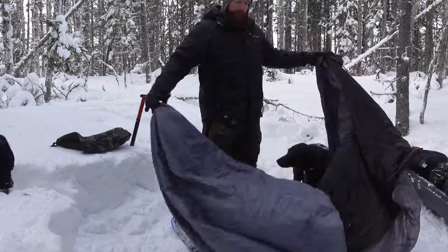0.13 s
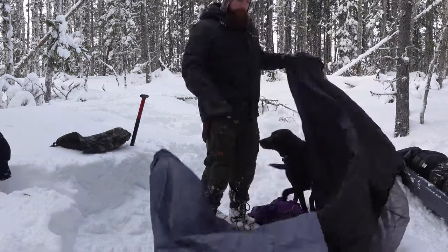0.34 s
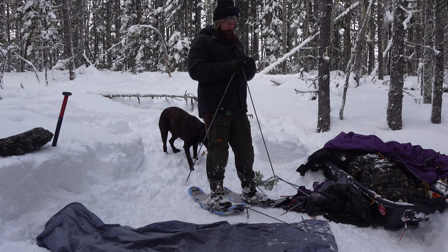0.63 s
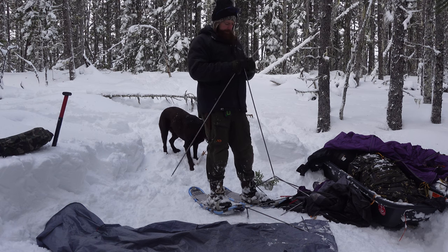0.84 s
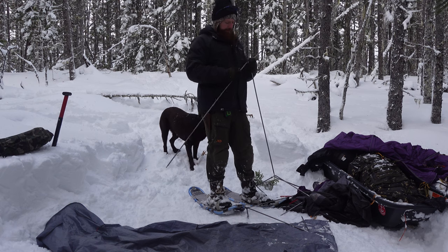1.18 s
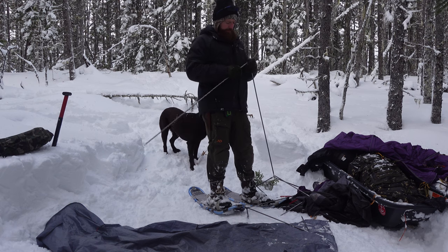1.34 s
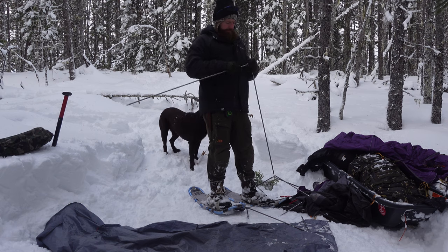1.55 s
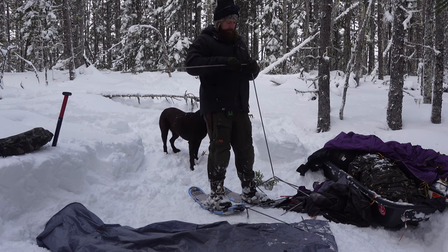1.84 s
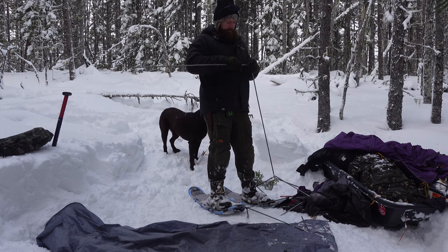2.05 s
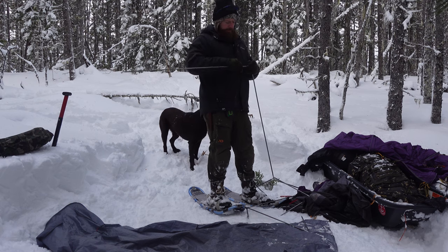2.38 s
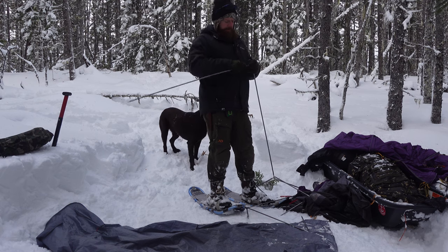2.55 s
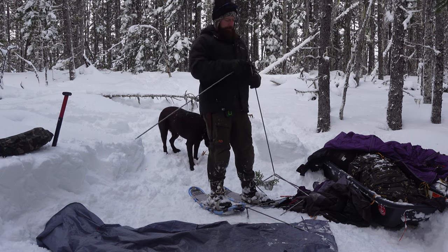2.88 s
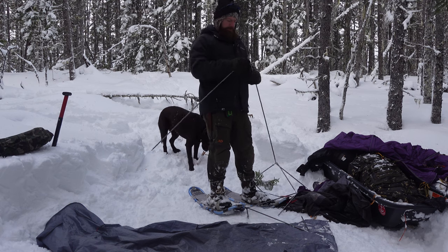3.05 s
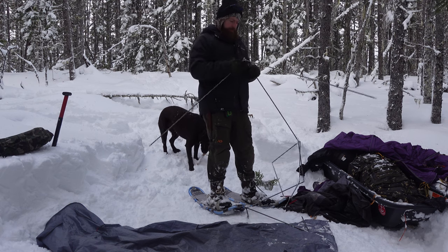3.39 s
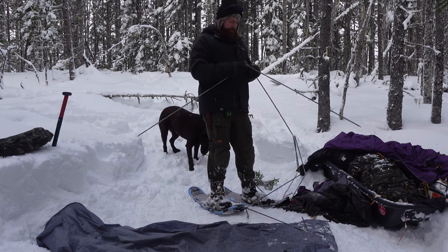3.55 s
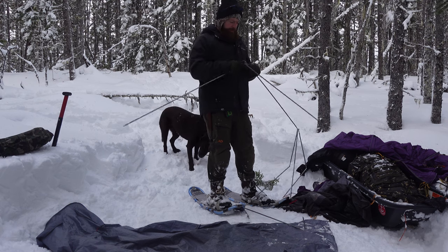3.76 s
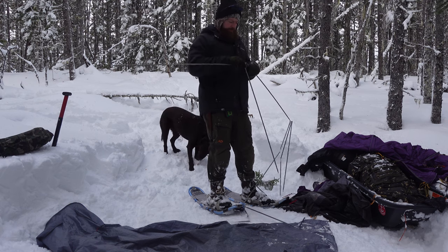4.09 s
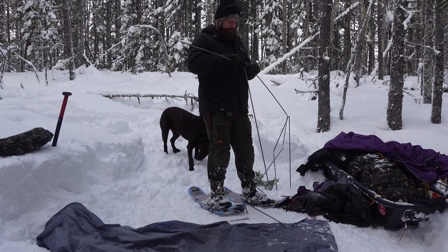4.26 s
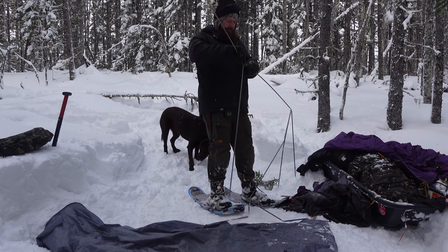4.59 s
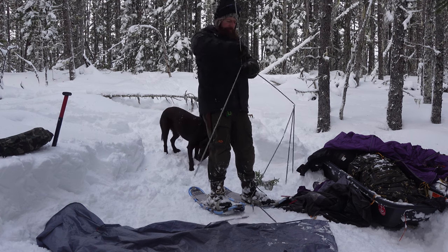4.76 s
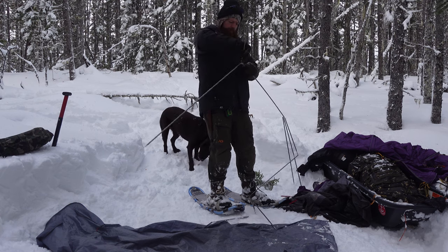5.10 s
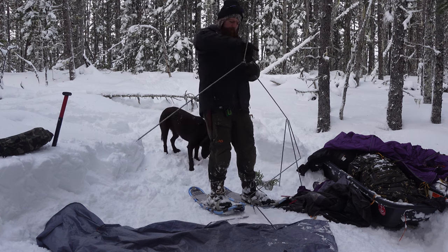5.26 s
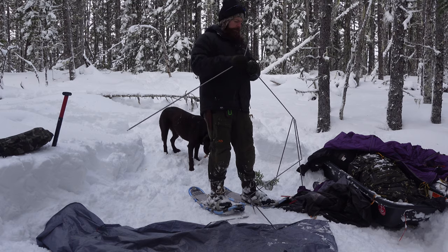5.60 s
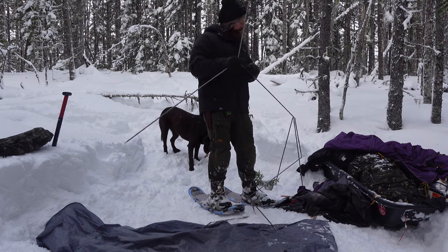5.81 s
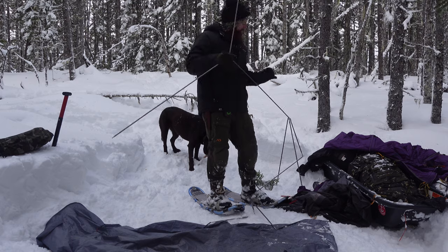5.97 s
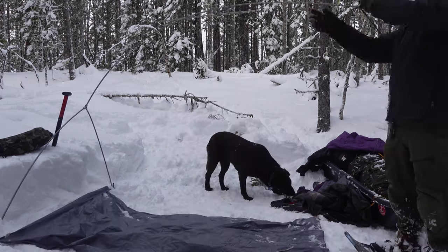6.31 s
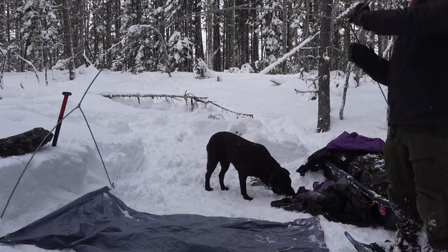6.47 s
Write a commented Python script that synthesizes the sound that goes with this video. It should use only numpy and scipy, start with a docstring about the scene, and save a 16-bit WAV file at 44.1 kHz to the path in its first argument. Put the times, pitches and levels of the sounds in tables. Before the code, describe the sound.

In a quiet snowy forest, tent fabric flaps for a moment, with a small jingle of dog tags. Irregular clicks, rattles and hollow knocks follow as tent pole sections meet, with one small metal clink among them and one sharp knock standing out. Low wind buffets the microphone beneath a faintly rustling jacket. Two soft sliding hisses and several dull knocks finish as the wind drops.

```python
"""Thin tent poles on an elastic cord are fitted together in a snowy forest: their ends tick and rattle as they
touch, and hiss as they slide into their sleeves. Blows ring the air in the tubes as hollow knocks. Before that,
a tent sheet is shaken out, rustling and flapping. Small metal pieces clink: first a dog's two tags, later a
buckle or pole ring. A jacket rustles and wind rumbles on the microphone; under the last dull knocks the wind
and the rustle change abruptly."""
import sys
import numpy as np
from scipy import signal
from scipy.fft import rfft, irfft
from scipy.io import wavfile
from scipy.ndimage import uniform_filter1d

SR = 44100
rng = np.random.default_rng(int(sys.argv[2]) if len(sys.argv) > 2 else 0)


def store_pcm(level_fs):
    """Save levels as 16-bit WAV."""
    pcm = np.round(np.clip(level_fs, -1, 1) * 32767).astype(np.int16)
    wavfile.write(sys.argv[1], SR, np.atleast_2d(pcm).T)


N = 292824

# The tone of still forest air and microphone hiss. Each row: frequency in Hz, level in dB.
AIR_TONE = [(71, -24.5), (120, 0.5), (218, -5.5), (517, -7.5), (622, -9), (765, -10), (1080, -11.5),
            (2180, -20), (5860, -36), (8150, -32), (9810, -40), (15100, -34.5), (16400, -47.5)]
# The tone of wind on the microphone. Each row: frequency in Hz, level in dB.
WIND_TONE = [(4.7, -48), (8.0, -6), (16, 4.5), (27, -12.5), (72, -20), (236, -47.5), (350, -56), (460, -85),
             (770, -120)]
# How strong the wind is, one list for each stretch of time. Each row: time in seconds, level in dB.
WIND_LEVELS = [
    [(0, -53), (.21, -49.5), (.502, -60)],
    [(.5, -53), (.85, -51.5), (1.05, -44.5), (1.35, -42.5), (1.6, -50), (1.7, -36), (1.83, -38.5),
     (1.95, -34.5), (2.08, -42.5), (2.25, -32.5), (2.43, -40), (2.6, -35.5), (2.8, -40), (3.3, -42.5),
     (3.55, -38.5), (3.8, -42), (4.5, -38.5), (5, -34), (5.12, -38.5), (5.3, -33.5), (5.47, -32),
     (5.62, -39), (5.72, -34), (5.9, -45), (6.05, -41.5), (6.17, -48.5)],
    [(6.175, -41.5), (6.21, -55), (6.64, -55.5)],
]
# The rustling jacket, one list for each stretch of time.
# Each row: time in seconds, level in dB, extra treble in dB.
JACKET_MOVES = [
    [(.503, -79, 1.5), (.86, -72.5, -1), (1.25, -75.5, 3.5), (1.38, -68.5, -5), (1.64, -89, 11),
     (2.3, -81.5, 3), (2.7, -74, 0.5), (3.07, -71, 1.5), (3.3, -71, 9.5), (3.52, -70, 10), (3.56, -72, 4.5),
     (3.85, -85.5, 10), (4.11, -79, 3), (4.24, -79, 4), (4.6, -68.5, -7), (4.89, -65, -1.5),
     (5.03, -74.5, -4), (5.15, -61.5, 0), (5.23, -70.5, -3), (5.41, -64, 2.5), (5.54, -68, -10),
     (5.7, -73, -1.5), (5.96, -66.5, -2.5), (6.174, -62.5, -4)],
    [(6.175, -68.5, 3.5), (6.249, -66, -12), (6.417, -62, -8), (6.64, -60, -4)],
]
# The tone of the jacket. Each row: frequency in Hz, level in dB.
JACKET_TONE = [(120, -20), (200, -16), (264, -18), (295, 5), (583, 1), (1220, -2), (4770, -4.5), (6060, -9),
               (8140, -4), (9970, -14), (13900, -11), (15500, -25.5), (16400, -48)]
# The shaken tent sheet. Each row: time in seconds, level in dB, extra treble in dB.
SHEET_MOVES = [(0, -50.5, -1.5), (.158, -53.5, 1), (.18, -52.5, -1), (.334, -50.5, 4.5), (.412, -46, -1),
               (.46, -58, 10), (.488, -42.5, -1.5), (.503, -48.5, 1)]
# The tone of the sheet. Each row: frequency in Hz, level in dB.
TENT_SHEET_TONE = [(59, -43), (100, -14), (600, -8), (901, -9), (1050, -11.5), (1160, -11), (3380, -14),
                   (5890, -22), (8290, -18), (10000, -31.5), (13500, -25), (15400, -35), (16400, -48)]
# Folds whipping tight. Each row: start in seconds, level in dB, pitch in Hz, fade time in seconds.
# A fade time (t60 in the code) is how long a sound takes to drop by 60 dB.
SHEET_FLAPS = [(.014, -48, 2500, 0.011), (0.068, -46.5, 790, 0.074), (.09, -49, 855, 0.14),
               (.104, -43.5, 774, 0.055), (.152, -40.5, 3430, 0.0084), (0.209, -29.5, 1450, 0.0069),
               (0.292, -46.5, 8300, 0.077), (.402, -41, 900, 0.021), (0.46, -38.5, 1020, 0.034)]
# The modes (natural ringing notes) of small metal pieces, one list each: the dog's two tags,
# then a buckle or pole ring. Each row: pitch in Hz, level in dB, fade time in seconds.
METAL_MODES = [
    [(2625, 0.5, 0.11), (6514, -28, 0.064), (6745, -8.5, 0.083), (12100, -7, .046), (12600, -0.5, .044)],
    [(11600, -7, 0.031), (12340, -13, .035)],
    [(4600, -13.5, 0.041), (8460, 0, .073), (12820, 4, 0.056), (12920, -15, .066)],
]
# Hits on those metal pieces, one list for each piece. Each row: start in seconds, level in dB,
# dB taken off the modes near 6600 Hz, level of the tick in dB, a factor that speeds up the fade.
METAL_HITS = [
    [(.2137, -28.5, -3, -42.5, 0.97), (.357, -36.5, 6, -45, 1.2)],
    [(.582, -53, 9, -68.5, 1.0)],
    [(3.551, -39, -1.5, -43.5, 0.92)],
]
# A pole end sliding in its sleeve, one list for each stroke. Each row: time in seconds, level in dB,
# tube pitch in Hz, rim pitch in Hz, rim level in dB compared with the tube.
POLE_SLIDES = [
    [(5.78, -70, 2600, 7500, -14), (5.82, -71.5, 2550, 7400, -6), (5.855, -65.5, 2460, 7500, -3),
     (5.87, -86, 2300, 7600, -6)],
    [(5.99, -71, 3560, 8800, -24.5), (6.02, -71, 3440, 8600, -1), (6.09, -71.5, 3030, 8700, 4),
     (6.155, -66.5, 2750, 8600, -3), (6.165, -88, 2800, 8600, -2)],
]
# Hollow knocks. Each row: start in seconds, level in dB, pitch of the upper mode in Hz,
# level of the lower mode in dB compared with the upper.
POLE_KNOCKS = [(0.6298, -55, 710, 3), (0.7363, -55, 980, -17), (1.6856, -50, 1120, -20),
               (1.9558, -47.5, 1080, -19), (2.3757, -44, 1060, -26), (2.6659, -49.5, 1060, -14),
               (2.7901, -27.5, 930, 2), (2.813, -42, 1195, -22), (3.0185, -53, 1270, -22),
               (3.166, -32, 1140, 1), (3.244, -43, 1070, 8), (3.289, -48, 1090, -7),
               (3.3005, -53, 1050, -19), (3.3977, -50, 1026, 1), (3.42, -61, 940, -8),
               (4.102, -44, 1067, -22), (4.1166, -49, 1255, -24), (4.468, -48, 1030, -7),
               (4.4813, -47, 974, -9), (4.7146, -55, 1210, -11), (4.9722, -15, 1138, -8.5),
               (5.1095, -33.5, 1416, -6), (5.968, -54.5, 864, -9), (6.1845, -41, 880, -17),
               (6.1886, -44, 970, -15), (6.22, -36.5, 906, -6), (6.275, -34, 820, -1),
               (6.3207, -33.5, 750, 0.3), (6.396, -49.5, 1290, -7)]
# The modes of a hand-held pole in five groups: low, lower middle, upper middle, treble and top.
# Each row: pitch in Hz, width in Hz (wider dies sooner), level in dB within its group.
POLE_MODES = [
    [(562, 230, -19), (1030, 340, 2), (1460, 1600, -0.5)],
    [(2340, 1220, 4.5), (3320, 1100, 0)],
    [(3786, 930, -0.5), (5310, 1370, -1)],
    [(7010, 1100, -1), (8284, 930, 2.5)],
    [(11580, 2100, 2), (12900, 1500, 3), (14800, 1300, -5)],
]
# The clearest ticks of the pole ends. Each row: start in seconds, level in dB,
# extra dB for the treble group, extra dB for the top group, fade time in seconds.
POLE_TICKS = [(.6601, -45.5, -1, -21, 0.011), (1.0286, -60, -3, -20, 0.025), (1.0396, -55.5, -2, -25, .023),
              (1.0507, -57.5, 3.5, -11, .012), (1.068, -59, -10, -15, .03), (1.177, -38, -2.5, -7.5, 0.014),
              (1.4632, -57, -5.5, -8, 0.064), (1.6821, -52, 7.5, -3, 0.03), (1.694, -50, -5, -8, 0.04),
              (1.711, -40, 10.5, -5, 0.011), (1.89, -50.5, 0, -16, 0.011), (1.9533, -43, 0, -6.5, 0.022),
              (1.967, -50, -3, -19, 0.012), (2.0264, -65.5, 13, -10, .005), (2.2309, -46.5, -1, -13, 0.045),
              (2.3655, -52.5, 1, -7, 0.02), (2.3753, -31.5, 5, -7, 0.011), (2.4653, -57, -2, -8, 0.03),
              (2.6885, -54, 7.5, -6, 0.0045), (2.7899, -31.5, -16.5, -28, 0.0053),
              (2.8386, -49, -6, -9, 0.011), (2.8835, -55, -5, -11, 0.014), (2.9042, -50, -9, -14, .0068),
              (2.9116, -43.5, 3, -14, 0.02), (2.919, -40.5, 2, -6, 0.0053), (2.9882, -54.5, 2, -4, 0.042),
              (3.0115, -44.5, -13, -26, 0.0035), (3.0498, -52, -1.5, -22, 0.031),
              (3.1334, -57.5, 2, -11, 0.018), (3.1668, -32, -1, -2.5, 0.026), (3.177, -34, 2, -18, 0.017),
              (3.2403, -41, -5, -10, .019), (3.2707, -55.5, 1, -4, 0.063), (3.642, -50, -1, -4, 0.015),
              (3.7524, -57, -9, -12, 0.037), (3.9173, -60, -1, -1, 0.025), (3.966, -43, 3.5, -5, 0.026),
              (3.971, -41, 3, -6, 0.018), (3.9827, -72, 9, 8, .011), (4.0203, -35, 8.5, -4, 0.017),
              (4.0549, -52.5, 12, -1, 0.01), (4.075, -45.5, 3.5, -4, 0.054), (4.1006, -39, 17.5, 16, .02),
              (4.1083, -36, 7, 13.5, .016), (4.117, -37, 9.5, -1, 0.019), (4.1362, -53, -2.5, -15, 0.089),
              (4.406, -59, -6, -31, 0.033), (4.4698, -53, -24, -30, .0056), (4.481, -55, -12.5, -25, 0.021),
              (4.7135, -55.5, 2, -1, 0.015), (4.8704, -59, -5, -5, 0.065), (4.944, -51, 2, -9, 0.0067),
              (4.9721, -28, 0.5, -7.5, 0.019), (4.9846, -41.5, 13, 7, 0.0053),
              (5.0912, -48, -7, -25, 0.058), (5.1069, -25.5, 2, -7, 0.025), (5.1234, -34, -9, -19, 0.007),
              (5.1377, -40, 0, -25, 0.0085), (5.1446, -34.5, -1, -10, 0.014), (5.178, -46, -8, -18, .011),
              (5.187, -53, -11, -24, .016), (5.1973, -54.5, -8, -20, 0.04), (5.278, -62.5, 10.5, 3, 0.056),
              (5.2999, -37.5, 7.5, 4.5, 0.031), (5.3202, -53, -8, -12, .086), (5.345, -37, -13, -17, .035),
              (5.3634, -45, -2, -14, 0.022), (5.3731, -46.5, -3, -14, 0.057), (5.3801, -39.5, 2, -7, 0.025),
              (5.3888, -32, -8, -19, 0.013), (5.4085, -33, 3.5, -25, 0.0036), (5.415, -49, -5, -19, .013),
              (5.455, -49.5, -14, -25, 0.016), (5.4738, -58, -19, -16, .03),
              (5.488, -46.5, 0.5, -17, 0.039), (5.4969, -61, -7, -14, .028),
              (5.5077, -38.5, 4.5, -9, 0.0038), (5.538, -54, -16, -25, 0.02),
              (5.6525, -47.5, 4, -20, 0.0078), (5.6606, -49, 3, -22, 0.014), (5.6694, -51, -2, -25, 0.012),
              (5.7333, -58, 1, -26, 0.012), (5.774, -49.5, -9.5, -34, 0.023),
              (5.8522, -55, -10, -19, 0.023), (5.8972, -63, -3, -12, .02), (5.9107, -48, 9, -17, 0.0048),
              (5.966, -50, -9, -12, 0.006), (5.9986, -51, -11, -12, 0.01), (6.141, -51.5, -5, -21, 0.029),
              (6.2207, -60.5, -5, -23, 0.051), (6.278, -44.5, -20, -29, .0074),
              (6.3197, -50, -37, -37, 0.015), (6.3976, -51, -32, -26, 0.0029)]


def gain_of(db):
    """Turns decibels into a number to multiply by."""
    return 10 ** (np.asarray(db) / 20)


def evened(x):
    """Scales a signal so that its average strength (rms) is 1."""
    return x / np.sqrt(np.mean(x ** 2) + 1e-20)


def add(mix, start_s, sound):
    """Adds a sound to the mix at its start time."""
    part = mix[..., round(start_s * SR):][..., :sound.shape[-1]]
    part += sound[..., :part.shape[-1]]


def coloured(x, tone):
    """Shapes a signal with a tone table and scales it to strength 1."""
    tone_hz, tone_db = np.transpose(tone)
    hz = np.fft.rfftfreq(len(x), 1 / SR)
    db = np.interp(np.log(hz + 1), np.log(tone_hz + 1), tone_db)
    return evened(irfft(rfft(x) * gain_of(db), len(x)))


def resonate(x, hz, *widths_hz):
    """Keeps the sound near one pitch, which may glide; it filters once for each width given."""
    turn = np.exp(2j * np.pi * np.cumsum(hz * np.ones(len(x))) / SR)
    for width in widths_hz:
        decay = np.exp(-np.pi * width / SR)
        # shift the pitch down to zero, smooth, and shift back
        x = 2 * (turn * signal.lfilter([1 - decay], [1, -decay], x / turn + 1e-18)).real
    return x


def ring(drive, modes):
    """Lets a signal ring a group of modes; white noise comes out as strong as it went in."""
    click = np.eye(1, 1024)[0]
    response = sum((-1) ** k * gain_of(db) * resonate(click, hz, width, 2 * width)
                   for k, (hz, width, db) in enumerate(modes))
    return signal.oaconvolve(drive, response / np.linalg.norm(response))[:N]


def curves(rows):
    """Joins a table's rows with straight lines; gives the sample times and a curve for each column."""
    times, *columns = np.transpose(rows)
    t = np.arange(max(times[0], 0), times[-1], 1 / SR)
    t = t[:N - round(t[0] * SR)]
    return t, [np.interp(t, times, column) for column in columns]


def during(x, t):
    """The part of a signal that falls on the sample times t."""
    return x[round(t[0] * SR):][:len(t)]


def lows(x, hz):
    """Keeps the sound below a frequency."""
    return signal.sosfiltfilt(signal.butter(2, hz, fs=SR, output="sos"), x)


def flicker(noise, depth_db, samples):
    """Smooths noise into a wandering volume; more samples make it wander more slowly."""
    return gain_of(depth_db * evened(uniform_filter1d(noise, samples)))


def still_air():
    """Quiet forest air and microphone hiss make a steady bed of noise."""
    return gain_of(-70) * coloured(rng.standard_normal(N), AIR_TONE)


def forest_echo(x, t60=0.08):
    """Sound scatters briefly off the body, the snow and the nearest trunks."""
    t = np.arange(8000) / SR
    tail = rng.standard_normal(len(t)) * gain_of(-60 * t / t60) * (t > .002)
    return signal.oaconvolve(x, tail / np.linalg.norm(tail))[:N]


def wind(lump_s=.07, lump_db=3.6, fade_s=.003):
    """Swirling air rumbles on the microphone in lumps; strong gusts also grow a faster flutter."""
    out = np.zeros(N)
    swirl = coloured(rng.standard_normal(N), WIND_TONE)
    rumble = lows(swirl, hz=60)
    flutter = swirl - rumble
    rumble /= np.sqrt(uniform_filter1d(rumble ** 2, 5000) + .1)  # steadied, so the gusts set the level
    lump_samples = round(lump_s * SR)
    rumble *= flicker(uniform_filter1d(rng.standard_normal(N), lump_samples), lump_db, lump_samples)
    for rows in WIND_LEVELS:
        t, (level_db,) = curves(rows)
        flutter_db = level_db + 0.11 * (level_db + 38.5)
        gust = gain_of(level_db) * during(rumble, t) + gain_of(flutter_db) * during(flutter, t)
        fade = np.clip(np.minimum(t - t[0], t[-1] - t) / fade_s, 0, 1)
        add(out, t[0], fade * gust)
    return out


def cloth(moves, tone, snaps_per_s, spread_db, snap_share, flicker_db, split_hz):
    """Fibres hiss as they rub; creases snap at random, a few of them loudly."""
    sizes = gain_of(spread_db * np.minimum(rng.exponential(1, N), 4))
    snaps = sizes * (rng.random(N) < snaps_per_s / SR)
    creases = rng.standard_normal(N) * signal.lfilter([1], [1, -.94], snaps)  # about a millisecond each
    rustle = coloured(snap_share * evened(creases) + (1 - snap_share) * rng.standard_normal(N), tone)
    low = lows(rustle, split_hz)
    # coarse folds and fine weave swell at their own moments
    folds, weave = flicker(rng.standard_normal((2, N)), flicker_db, samples=700)
    low, high = folds * low, weave * (rustle - low)
    out = np.zeros(N)
    for rows in moves:
        t, (level_db, treble_db) = curves(rows)
        add(out, t[0], gain_of(level_db) * (during(low, t) + gain_of(treble_db) * during(high, t)))
    return out


def sheet_flaps(rise_s=0.00031):
    """Folds of the sheet whip tight, each making a short puff of noise around one pitch."""
    out, t = np.zeros(N), np.arange(2000) / SR
    for start_s, db, hz, t60 in SHEET_FLAPS:
        puff = evened(resonate(rng.standard_normal(len(t)), hz, hz, hz))
        rise = 1 - np.exp(-t / rise_s)
        add(out, start_s, gain_of(db - 60 * t / t60) * rise * puff)
    return out


def metal_clinks(tick_t60=0.012):
    """Small metal pieces hit with a sharp tick, then ring freely and die away."""
    out, ticks, t = np.zeros(N), np.zeros(N), np.arange(6000) / SR
    for modes, hits in zip(METAL_MODES, METAL_HITS):
        for start_s, db, lost_db, tick_db, damping in hits:
            for hz, mode_db, t60 in modes:
                nearness = np.exp(-(np.log(hz / 6600) / 0.46) ** 2)
                level_db = db + mode_db - lost_db * nearness - 60 * damping * t / t60
                note = np.sin(2 * np.pi * (hz * t + rng.random()))
                add(out, start_s, gain_of(level_db) * note)
            add(ticks, start_s, gain_of(tick_db - 60 * t / tick_t60) * rng.standard_normal(len(t)))
    upper_middle, treble, top = POLE_MODES[2:]  # the ticks share the pole's bright tone
    return out + ring(ticks, treble) + .5 * ring(ticks, upper_middle) + 0.31 * ring(ticks, top)


def pole_slides():
    """Rubbing noise sings in the air of the tube and whistles at the rim of the sleeve."""
    out = np.zeros(N)
    for rows in POLE_SLIDES:
        t, (level_db, tube_hz, rim_hz, rim_db) = curves(rows)
        rub = rng.standard_normal(len(t)) * flicker(rng.standard_normal(len(t)), depth_db=2.6, samples=200)
        tube = evened(resonate(rub, tube_hz, 320))
        rim = evened(resonate(rub, rim_hz, 250, 400) + 0.43 * resonate(rub, 0.84 * rim_hz, 400))
        add(out, t[0], gain_of(level_db) * (tube + gain_of(rim_db) * rim))
    return out


def pole_knocks(rise_s=0.00066, lower_rise_s=0.0013):
    """A blow rings the air in a hollow tube: one mode, and another about an octave below it."""
    out, t = np.zeros(N), np.arange(3000) / SR
    for start_s, db, hz, lower_db in POLE_KNOCKS:
        t60 = 0.025 * 2 ** ((-46 - db) / 22.5)  # a harder blow is gripped tighter and dies sooner
        upper = np.sin(2 * np.pi * hz * t) * gain_of(-60 * t / t60)
        lower = np.sin(2 * np.pi * 0.522 * hz * t) * gain_of(lower_db - 60 * t / (0.91 * t60))
        lower *= 1 - np.exp(-t / lower_rise_s)  # swells a little later
        # the loose joint roughens the ring
        rattle = 1 + 0.83 * evened(resonate(rng.standard_normal(len(t)), 640, 1100, 1100))
        rough = upper * rattle * np.linalg.norm(upper) / np.linalg.norm(upper * rattle)
        blow = (1 - np.exp(-t / rise_s)) * (rough + lower)
        add(out, start_s, gain_of(db - max(lower_db, 0)) * blow)
    return out


def faint_ticks(count=14, start_s=2.2, end_s=6.15):
    """Handling the poles makes faint ticks by chance; gives rows like those of POLE_TICKS."""
    return [(rng.uniform(start_s, end_s), -66 + rng.uniform(-4.2, 4.2), -18 + rng.uniform(-20, 20), -11, .03)
            for _ in range(count)]


def pole_ticks():
    """Pole ends meet in a quick chatter of tiny contacts that rings the pole's five groups of modes."""
    t, drives = np.arange(2048) / SR, np.zeros((5, N))
    for start_s, db, treble_db, top_db, t60 in POLE_TICKS + faint_ticks():
        rise = 1 - np.exp(-t / (0.04 * t60))  # long chatters start softly
        shape = rise * gain_of(-60 * t / t60)
        clumps = flicker(rng.standard_normal(len(t)), depth_db=2.4, samples=25)  # contacts bunch up
        chatter = rng.standard_normal((5, len(t))) * shape * clumps
        chatter *= np.linalg.norm(shape) / np.linalg.norm(chatter, axis=1, keepdims=True)
        lean_db = 0.3 * treble_db  # hard, bright contacts favour the upper middle, padded ones the lower
        group_db = np.array([-16, -4.5 - lean_db, lean_db, treble_db, top_db])
        add(drives, start_s, gain_of(db + group_db[:, None]) * chatter)
    return sum(ring(drive, modes) for drive, modes in zip(drives, POLE_MODES))


def scene():
    """Mixes everything into one channel; only the ticks, clinks and knocks get an echo."""
    hits = pole_ticks() + metal_clinks()
    knocks = pole_knocks()
    sheet = cloth([SHEET_MOVES], TENT_SHEET_TONE, snaps_per_s=550, spread_db=2.5,
                  snap_share=0.37, flicker_db=1.5, split_hz=1000)
    jacket = cloth(JACKET_MOVES, JACKET_TONE, snaps_per_s=150, spread_db=4.5,
                   snap_share=0.24, flicker_db=1.8, split_hz=2800)
    air = still_air()
    echo = gain_of(-14.5) * forest_echo(hits + gain_of(-1) * knocks)
    return (hits + knocks + echo + pole_slides() + sheet + sheet_flaps() + jacket + air + wind())[None]


def record(dry):
    """Takes away the very highest treble, above 16300 Hz."""
    low_pass = signal.firwin(511, 16300, window=("kaiser", 9), fs=SR)
    return signal.oaconvolve(dry, low_pass[None], "same")


dry = scene()
out = record(dry)
store_pcm(out)
```